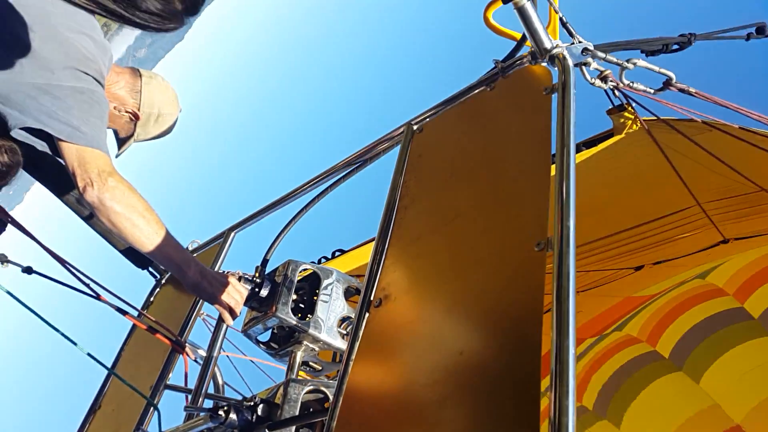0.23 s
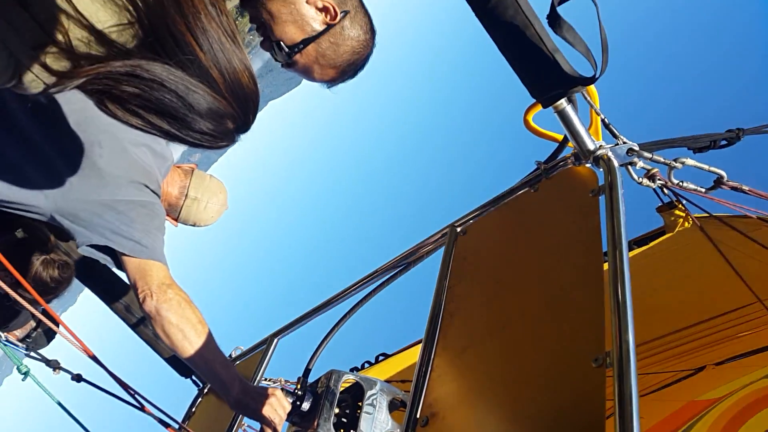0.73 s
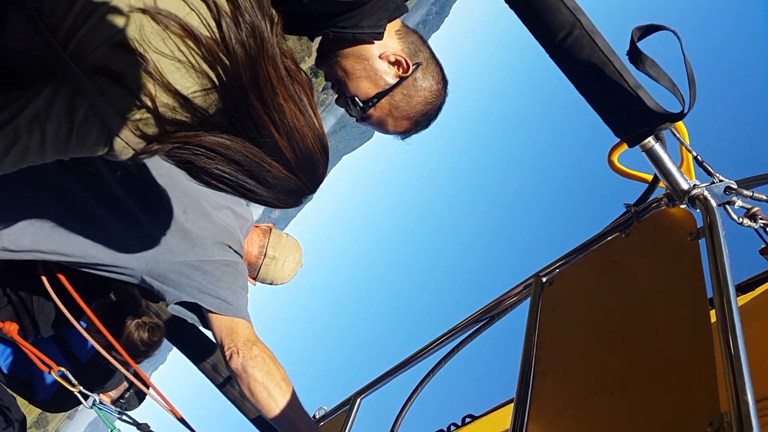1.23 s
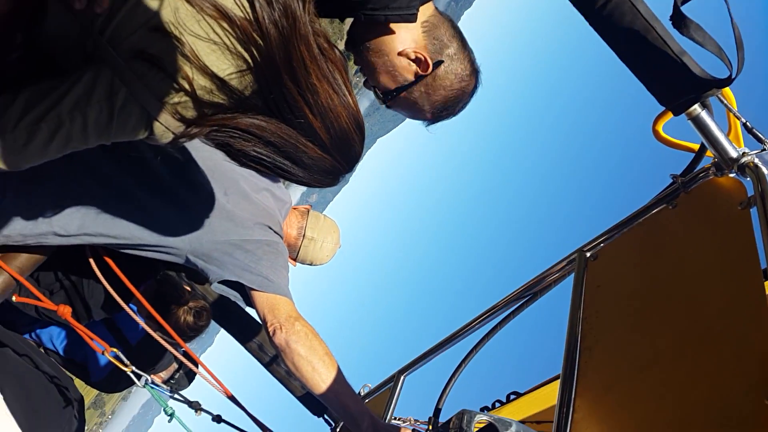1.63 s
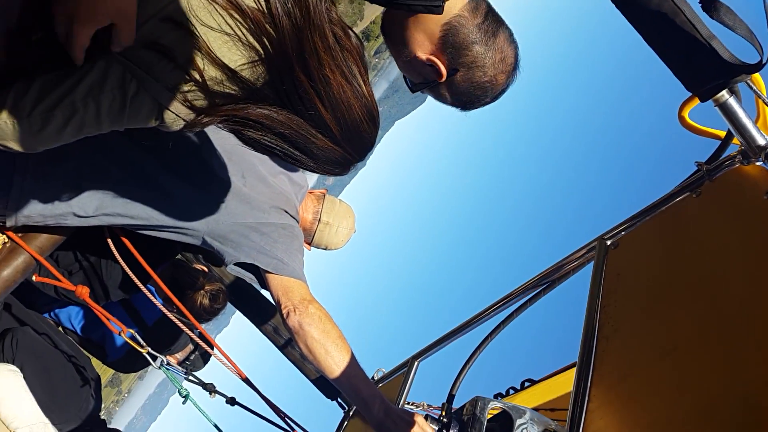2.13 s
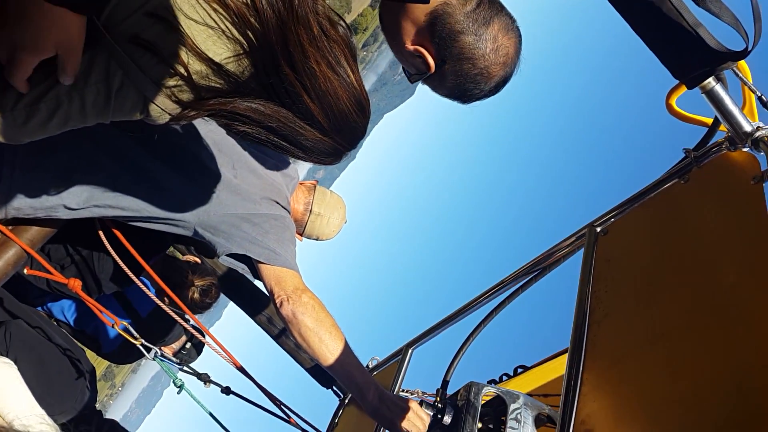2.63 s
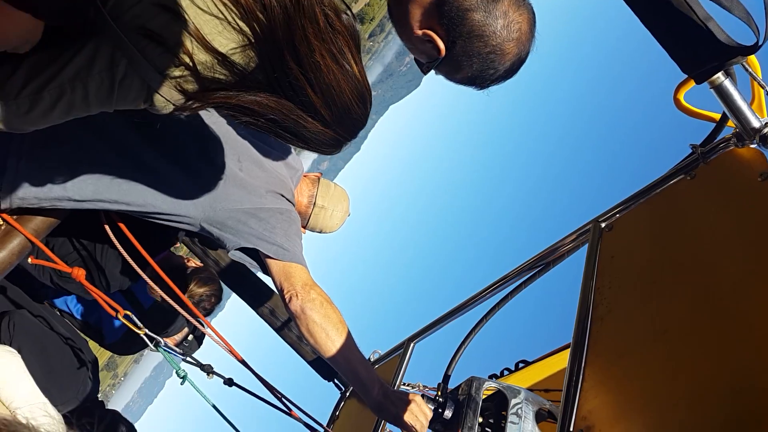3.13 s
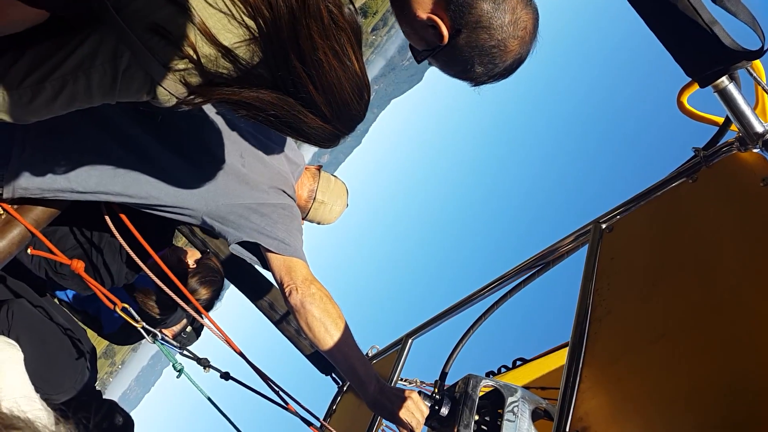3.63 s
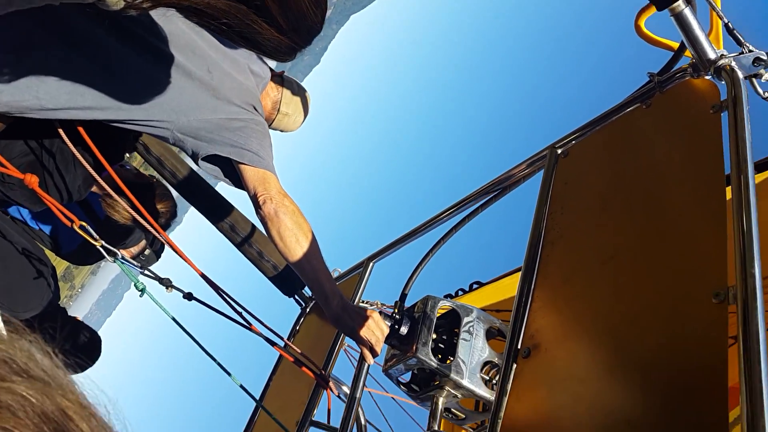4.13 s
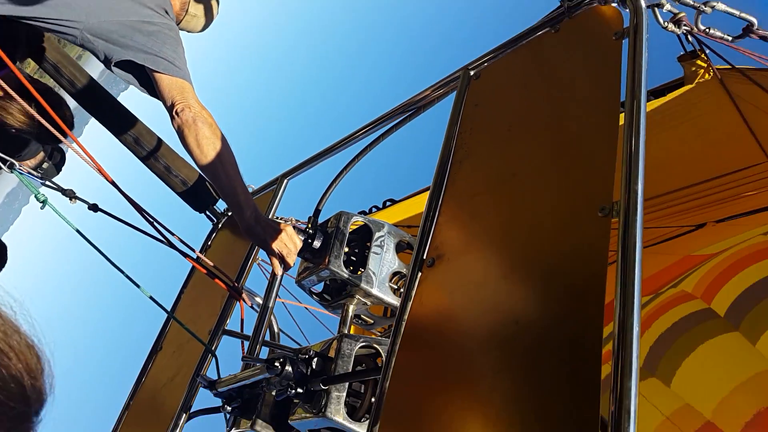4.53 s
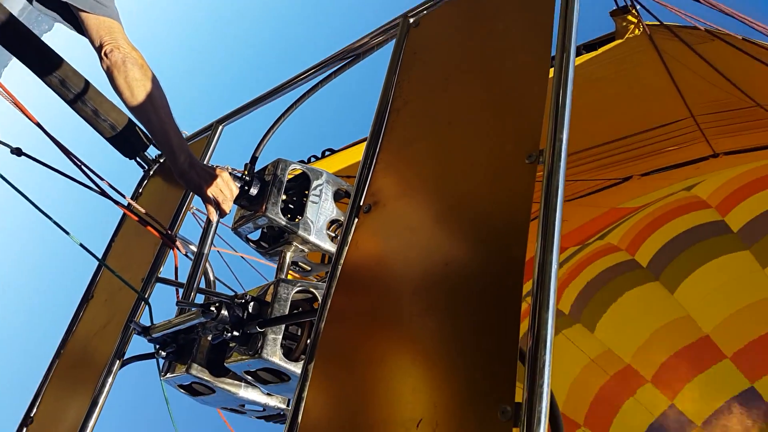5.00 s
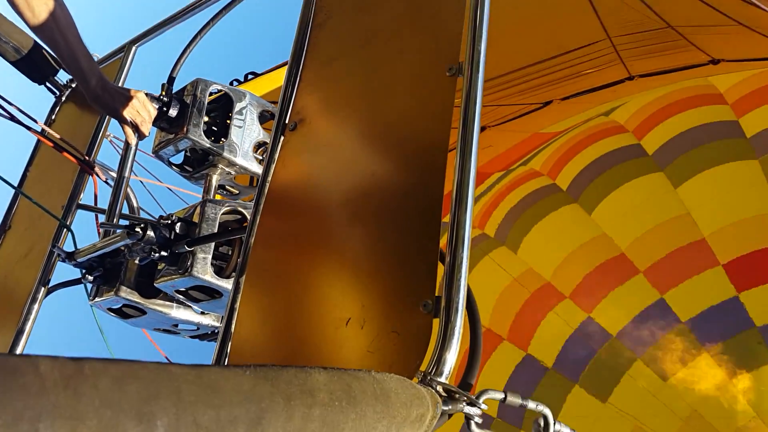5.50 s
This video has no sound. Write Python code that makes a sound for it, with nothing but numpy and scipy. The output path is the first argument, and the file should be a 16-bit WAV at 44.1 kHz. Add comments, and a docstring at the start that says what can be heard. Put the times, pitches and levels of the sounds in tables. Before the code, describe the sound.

Close above a balloon basket in open air, a propane burner fires a half-second blast with a soft whump at its start, pauses briefly, then roars for about a second and a half. A quiet second follows with a low pilot-flame murmur and a thin rising hiss and whistle. A third blast bursts in and holds to the end. Stereo microphones are near, the right facing the burner and brighter.

```python
"""Open air, close above a balloon basket: a propane burner fires three blasts, the last running to the end.
The flame is shaped noise, a low roar and a middle rush, with the gas jets' high hiss on top.
Clouds of gas lighting in the first and third blasts whump: short pressure pulses.
In the pauses the last gas dies off and the pilot murmurs, breathes, hisses and whistles.
The right microphone faces the burner, the left is shadowed."""
import sys
import numpy as np
from scipy import signal
from scipy.fft import rfft, irfft
from scipy.io import wavfile

SR = 44100
rng = np.random.default_rng(int(sys.argv[2]) if len(sys.argv) > 2 else 0)


def inscribe(sig):
    """Save sig as 16-bit PCM at rate SR to the path in sys.argv[1].

    A 1-D sig is mono; a 2-D sig holds one channel per row.
    Samples are clipped to [-1, 1] before scaling.
    """
    pcm = np.round(np.clip(np.atleast_2d(sig).T, -1, 1) * 32767)
    wavfile.write(sys.argv[1], SR, pcm.astype(np.int16))


N = 254016
HZ = np.maximum(np.arange(N // 2 + 1) * SR / N, 1)

# noise colours of the blast, relative [f/Hz, left level/dB, right level/dB]
ROAR_COLOUR = [(20, -33.5, -30.5), (41.66, -17.5, -9), (85, -6.5, -8), (138, 0.5, 2.5), (167, 1, 1),
               (282, 0.5, 2), (351, -5.5, -2.5), (470.5, -9, -9), (563, -17, -20.5), (711, -19, -17.5),
               (1223, -82, -69)]
RUSH_COLOUR = [(320, -33.5, -38), (580, -33, -72.5), (734, -18.5, 8), (840, -6.5, 3.5), (916, -0.5, 5.5),
               (958, -8, -7.5), (1176, -6.5, -1.5), (1800, -18, -2.5), (2030, -16, -6.5), (3010, -22, -5.5),
               (3130, -23.5, -10.5), (3330, -24, -13), (3980, -20.5, -23.5), (3670, 9.5, -18),
               (4500, -47.5, -17.5), (5010, -15, -83), (5670, -35, -51), (6660, -20.5, -48),
               (7560, -67.5, -55)]
HISS_COLOUR = [(4500, -60, -40), (5800, -60, -20), (6800, -55, -11), (8000, -44, -4), (9500, -43, -4),
               (10500, -35, -3), (12500, -28, -1.5), (13500, -25, -1.5), (14600, -21, 0)]
# roar bands whose level changes [f/Hz, width/octaves]
ROAR_BANDS = [(85, 0.42), (600, 0.47)]
# gain of the roar bands [t/s, level near 85 Hz/dB, level near 600 Hz/dB]
ROAR_BAND_GAINS = [(0, -1, 4), (.5, 3.5, 2), (.8, 0, 1.5), (.9, 2, 3.5), (1.5, 0.5, 0.9), (2.1, -4.5, 3.5),
                   (2.3, 8, -3), (3.3, 6.5, 3.5), (3.9, -4, -1), (4.6, 1.5, -0.5), (5.76, -10, 2.5)]
# rush and hiss bands whose level changes [f/Hz, width/octaves]
UPPER_BANDS = [(1800, 0.24), (3800, .4), (6200, 0.26), (10700, .22), (13800, 0.18)]
# gain of those bands as blasts start and the microphones turn
# [t/s, level near 2 kHz/dB, near 4 kHz/dB, near 6 kHz/dB, near 11 kHz/dB, near 14 kHz/dB]
UPPER_BAND_GAINS = [(0, -2.5, -0.5, -0.5, -3.5, 3.5), (.5, -2.5, -1.5, -2.5, -5.5, -4),
                    (.6, 1, -7, 0, -3, -6), (.77, 7, -3, -4, 5, -8), (.83, -1, -3, -3, -0.5, -3),
                    (.9, 2, 2.5, -2, 2.5, -1.5), (1.6, 2.5, 4, -3.5, 2.5, 1), (2.1, 3, 1, -4, -1.5, -2),
                    (2.3, 1, -3.5, -3, 0, -9), (3.27, 2, -11, -22, -3, -5), (3.3, 6.5, -4, -26, 2, -3),
                    (3.34, 0.5, -1, -14, -0.5, -3), (3.5, 0, .1, -6, 0.5, -1), (4.1, 2, 3, -2.5, 0.5, -2.5),
                    (4.5, -0.5, -1, 1.2, -2, -0.5), (5.0, -1.5, -2, 0.5, -7, 1),
                    (5.4, -0.5, -4, 0.5, -6, 1.5), (5.76, -4.5, -1.5, 2.5, -4, 1.5)]


def burner():
    """Turbulent flame and gas jets as noise; one flutter shakes roar and rush together."""
    hiss_db, roar_db, rush_db = valve()
    flutter = drift(35.7)
    roar_db = roar_db + 0.64 * flutter + 0.6 * drift(62.0)
    rush_db = rush_db + 0.11 * flutter + 0.93 * drift(46.0)
    hiss_db = hiss_db + 0.61 * drift(33.0)
    roar = from_db(roar_db) * irfft(turbulence(ROAR_COLOUR), N)
    rush = from_db(rush_db) * irfft(turbulence(RUSH_COLOUR), N)
    hiss = from_db(hiss_db) * irfft(turbulence(HISS_COLOUR), N)
    roar = recolour(roar, ROAR_BANDS, ROAR_BAND_GAINS)
    return roar + recolour(rush + hiss, UPPER_BANDS, UPPER_BAND_GAINS)


# valve operations [opens t/s, shuts t/s, lever opening time/s, hiss level/dB, roar level/dB, rush level/dB,
# roar drift/(dB/s), rush drift/(dB/s), brief roar dip soon after the blast starts/dB (negative: a bump)]
BLASTS = [(-.022, 0.55, 0.015, -25.5, -22.5, -40.5, 1.5, 0.5, 7),
          (0.766, 2.209, 0.016, -27, -22, -42, 1.9, 3, -2.5),
          (3.257, 7, 0.02, -25, -19.5, -38.5, -0.92, -0.57, 8)]
PRESSURE_DB, PRESSURE_S = 6, 0.15  # the hiss gains its last few dB slowly
DIP_AFTER_S, DIP_WIDTH_S = 0.1, 0.032  # the roar dips briefly
LIGHTS_SHARE = 0.42  # the flame catches this far into the opening
# triples below: jet hiss, roar, rush
CLIMB_DB, CLIMB_SHARE = (59, 34, 22), (1.14, 0.47, 0.78)  # time constant as share of opening time
SHUT_LOSS_DB, EMPTYING_S = (25, 10, 12.5), (0.084, 0.054, 0.055)  # loss at shutting, e-fold growth time
DREGS_DB, DREGS_DB_PER_S = (-42.5, -24, -21), (-70, -101, -110)  # last gas, relative to the blast


def valve():
    """Levels of hiss, roar and rush: climb, hold, a fall steepening as the coil empties, dregs burning off."""
    t = np.arange(N) / SR
    power = 1e-12  # keeps the log finite
    climb_db, climb_share, loss_db, emptying_s, dregs_db, dregs_db_per_s = np.array(
        [CLIMB_DB, CLIMB_SHARE, SHUT_LOSS_DB, EMPTYING_S, DREGS_DB, DREGS_DB_PER_S])[..., None]
    for opens, shuts, opening_s, hiss_db, roar_db, rush_db, roar_drift, rush_drift, dip_db in BLASTS:
        open_s = np.clip(t - opens, 0, shuts - opens)
        lit_s = np.maximum(open_s - LIGHTS_SHARE * opening_s, 0)
        dip = dip_db * np.exp(-((open_s - DIP_AFTER_S) / DIP_WIDTH_S) ** 2)
        hold = np.array([hiss_db - PRESSURE_DB * np.exp(-open_s / PRESSURE_S),
                         roar_db + roar_drift * open_s - dip,
                         rush_db + rush_drift * open_s])
        since_start_s = np.array([open_s, lit_s, lit_s])
        hold = hold - climb_db * np.exp(-since_start_s / (climb_share * opening_s))
        fall = -loss_db * np.exp(np.minimum((t - shuts) / emptying_s, 5))
        dregs = dregs_db + dregs_db_per_s * np.maximum(t - shuts, 0)
        gate = np.clip((t - opens) / (LIGHTS_SHARE * opening_s), 0, 1)
        # from_db(2 * dB) is power
        power = power + gate * from_db(2 * hold) * (from_db(2 * fall) + from_db(2 * dregs))
    return 10 * np.log10(power)


# lighting gas pockets [t/s, envelope peak level/dB, f/Hz]
WHUMPS = [(0.0135, -1, 161), (0.0249, -3, 186), (3.2821, -21, 330), (3.2863, -12, 210), (3.2992, -9, 195.5),
          (3.3074, -3, 172)]
WHUMP_WIDTH_S = 0.0021
WHUMP_DIP_LEAD_RAD = 0.55  # makes the dip before the peak the deeper one


def whumps():
    """Each lighting gas pocket is one soft low pressure pulse with a dip before and after."""
    out = np.zeros(N)
    for s, peak_db, hz in WHUMPS:
        t = np.arange(N) / SR - s
        envelope = from_db(peak_db) * np.exp(-(t / WHUMP_WIDTH_S) ** 2)
        out += envelope * np.cos(2 * np.pi * hz * t - WHUMP_DIP_LEAD_RAD)
    return out


# noise colours of the pilot flame and its jet, relative [f/Hz, left level/dB, right level/dB]
MURMUR_COLOUR = [(20.14, -27, -17.5), (40, -8, -13), (70, 5.5, 9), (109.7, 4, 0), (160.7, 1, 5.5),
                 (260.4, 5, 2), (395, -9, -1.5), (700, -28.5, -27.5), (1515, -86, -92.5)]
BREATH_COLOUR = [(248, -9, -32.5), (450, 1.5, -10), (720, 0, 2), (1003, 0, -2), (1250, -5.5, -3),
                 (1810, -23, -8.5), (2100, -23.5, -22), (2880, -42.5, -40), (4000, -70.5, -70)]
JET_COLOUR = [(2000, -19, -16), (2880, -17, -11.5), (3500, -6, -6.5), (3900, 0, -6.5), (4400, -9, -10),
              (5000, -7, -17), (5800, -33.5, -37.5), (7000, -35, -28.5), (8300, -35.5, -27.5),
              (9120, -34, -13), (10580, -30, -31), (12000, -28.5, -9.5), (13000, -27, -15.5),
              (14600, -22, -8)]
# deepest band of the murmur [f/Hz, width/octaves]
DEEP_BAND = [(70, .6)]
# gain of that band [t/s, level/dB]
DEEP_GAIN = [(0, 2), (.75, 8), (2.3, 0.5), (2.65, -5), (2.95, 1), (3.1, -11), (3.17, -3), (3.25, 3),
             (5.76, 1)]
# the level rises late in a long pause
MURMUR_DB, MURMUR_GAIN_RISE_AFTER_S, MURMUR_GAIN_RISE_DB_PER_S = -63.5, 0.56, 31.5
BREATH_DB, BREATH_GAIN_RISE_AFTER_S, BREATH_GAIN_RISE_DB_PER_S = -69, 0.64, 49
JET_DB, JET_GAIN_RISE_AFTER_S, JET_GAIN_RISE_DB_PER_S = -90, 0.73, 69
BREATH_FLARE_DB, BREATH_FLARE_S = 10.5, 0.11  # still stirred up when the valve shuts
JET_FLARE_DB, JET_FLARE_S = 16, 0.22


def pilot():
    """Small soft flame: low murmur, breathy middle, jet hiss with whistles; level rises late in a long pause."""
    pause = pause_s()
    murmur_db = MURMUR_DB + MURMUR_GAIN_RISE_DB_PER_S * np.maximum(pause - MURMUR_GAIN_RISE_AFTER_S, 0)
    breath_db = (BREATH_DB + BREATH_GAIN_RISE_DB_PER_S * np.maximum(pause - BREATH_GAIN_RISE_AFTER_S, 0)
                 + BREATH_FLARE_DB * np.exp(-pause / BREATH_FLARE_S))
    jet_db = (JET_DB + JET_GAIN_RISE_DB_PER_S * np.maximum(pause - JET_GAIN_RISE_AFTER_S, 0)
              + JET_FLARE_DB * np.exp(-pause / JET_FLARE_S))
    murmur = from_db(murmur_db + 1.33 * drift(8.0)) * irfft(turbulence(MURMUR_COLOUR), N)
    breath = from_db(breath_db + 0.58 * drift(13.0)) * irfft(turbulence(BREATH_COLOUR), N)
    jet = irfft(turbulence(JET_COLOUR), N) + whistles(pause)
    jet = from_db(jet_db + 1.0 * drift(15.0)) * jet
    return recolour(murmur, DEEP_BAND, DEEP_GAIN) + breath + jet


# pilot jet whistles [f/Hz, width/Hz, level/dB relative to the thin hiss]
PILOT_WHISTLES = [(11600, 150, -1), (9700, 200, -14.5), (3900, 250, -9)]
WHISTLE_AFTER_S, WHISTLE_HALF_RISE_DB, WHISTLE_RISE_S = 0.66, 8, 0.1  # before the jet hiss is lifted


def whistles(pause):
    """Narrow breathy noise bands of the pilot jet, mostly right, rising late in a pause."""
    whistle = 0
    for hz, width_hz, whistle_db in PILOT_WHISTLES:
        band = irfft(rfft(rng.standard_normal(N)) / (1 + (2 * (HZ - hz) / width_hz) ** 2), N)
        whistle = whistle + from_db(whistle_db + 0.8 * drift(9.0)) * band / np.std(band)
    rise = np.tanh((pause - WHISTLE_AFTER_S) / WHISTLE_RISE_S) - 1
    left_right_db = [[-25], [0]]
    return from_db(WHISTLE_HALF_RISE_DB * rise) * whistle * from_db(left_right_db)


def pause_s():
    """Time since the valve shut, until the next blast is well alight; else 0."""
    t = np.arange(N) / SR
    return sum(np.maximum(t - last[1], 0) * (t < blast[0] + DIP_AFTER_S)
               for last, blast in zip(BLASTS, BLASTS[1:]))


# sound shared by the microphones [f/Hz, left-right likeness 0-1, left lag/rad]
LIKENESS = [(60.1, 0.99, 0.053), (130, 1, 0.07), (251, 0.96, 0.29), (450, 1, 0.23), (670, 0.84, 1.43),
            (994, 1, 1.02), (1444, 0.5, 2.22), (2510, 0.6, 1.4), (3950, 0, 3.9), (14920, 0.04, 3.4)]


def turbulence(colour):
    """Stereo noise spectrum, partly shared, lagging on the shadowed left; the mean of both has rms 1."""
    shared, left, right = rfft(rng.standard_normal((3, N)))
    alike, lag_rad = over_hz(LIKENESS)
    alike = np.clip(alike, 0, 1)
    common = np.sqrt(alike) * shared * np.exp(-1j * lag_rad * [[1], [0]])
    separate = np.sqrt(1 - alike) * np.array([left, right])
    pair = (common + separate) * from_db(over_hz(colour))
    return pair / np.std(irfft(pair.mean(axis=0), N))


def recolour(x, bands, gains):
    """Each band of x follows its own level curve."""
    whole = rfft(x)
    for (hz, octaves), gain_db in zip(bands, in_time(gains)):
        band = irfft(whole * np.exp(-(np.log2(HZ / hz) / octaves) ** 2), N)
        x = x + (from_db(gain_db) - 1) * band
    return x


def drift(rate_hz):
    """Low-passed random curve of standard deviation 1, half amplitude at rate_hz."""
    slow = irfft(rfft(rng.standard_normal(N)) / (1 + (HZ / rate_hz) ** 2), N)
    return slow / np.std(slow)


def from_db(db):
    """dB to gain."""
    return 10 ** (np.asarray(db) / 20)


def in_time(rows):
    """Table columns as curves over every sample."""
    s, *columns = np.transpose(rows)
    return [np.interp(np.arange(N) / SR, s, c) for c in columns]


def over_hz(rows):
    """Table columns as curves over every frequency bin, linear in log frequency."""
    hz, *columns = np.transpose(rows)
    return np.array([np.interp(np.log(HZ), np.log(hz), c) for c in columns])


def scene():
    """Open air: no room."""
    return burner() + whumps() + pilot()


BASS_CUT_HZ, TOP_CUT_HZ = 52, 14520
SELF_NOISE_DB, SELF_RUMBLE_DB, SELF_RUMBLE_HZ = -95, -93, 30.3  # before the top cut


def record(dry):
    """Microphones roll off deep bass; faint own hiss and rumble are added, then the top is cut steeply."""
    bass_cut = signal.butter(3, BASS_CUT_HZ, "high", fs=SR, output="sos")
    top_cut = signal.ellip(16, .5, 90, TOP_CUT_HZ, fs=SR, output="sos")
    thin = signal.sosfilt(bass_cut, dry)
    self_noise = from_db(SELF_NOISE_DB) * rng.standard_normal(dry.shape)
    self_rumble = from_db(SELF_RUMBLE_DB) * drift(SELF_RUMBLE_HZ)
    return signal.sosfilt(top_cut, thin + self_noise + self_rumble)


dry = scene()
out = record(dry)
inscribe(out)
```